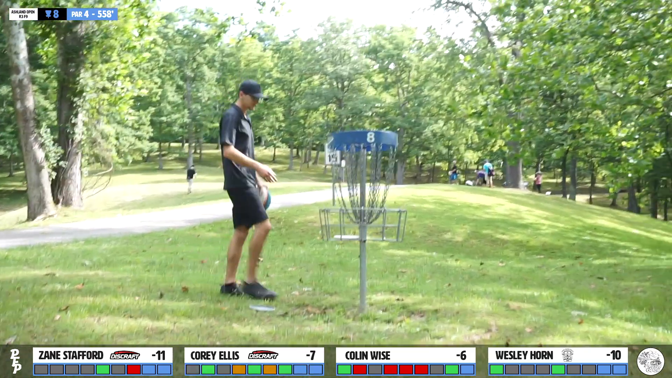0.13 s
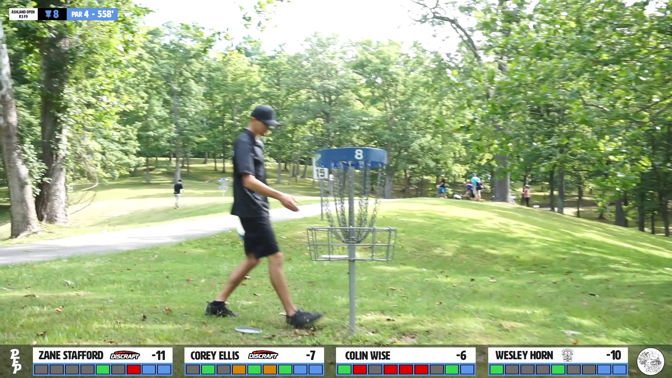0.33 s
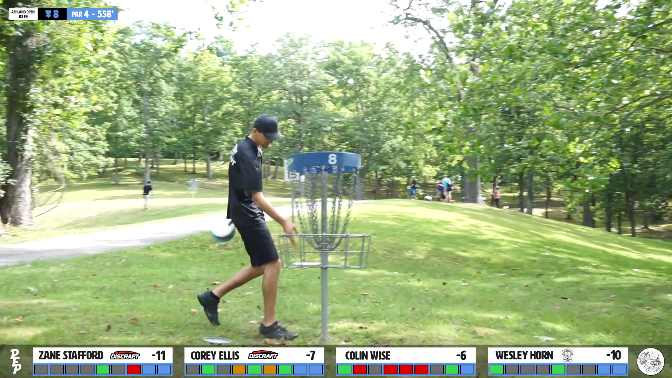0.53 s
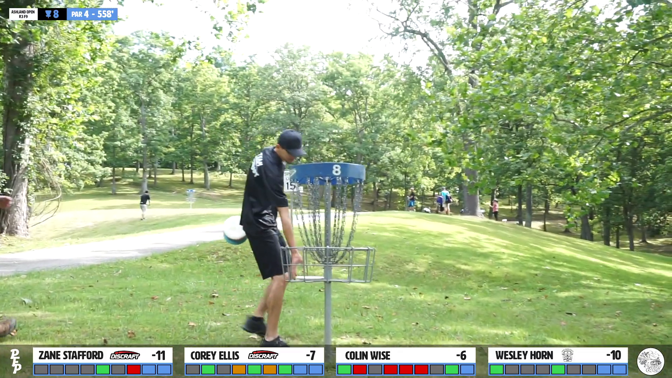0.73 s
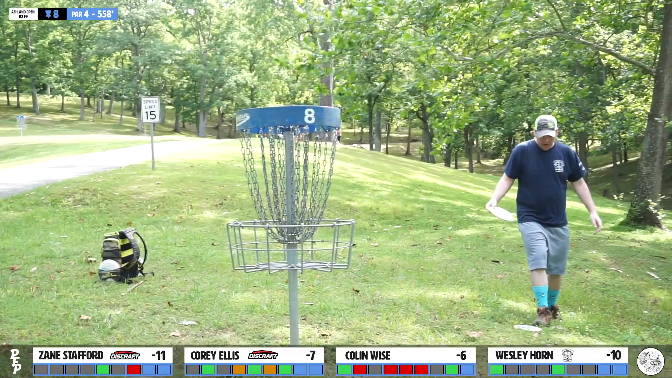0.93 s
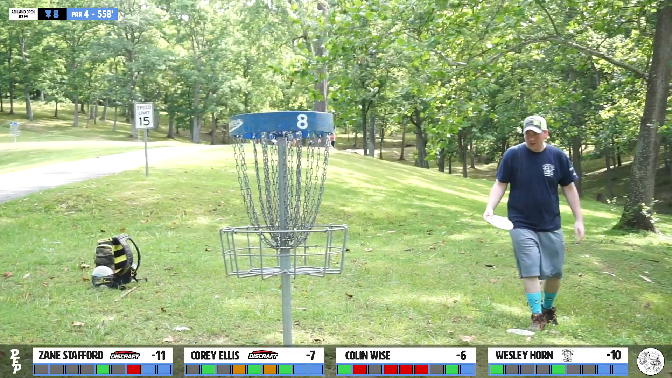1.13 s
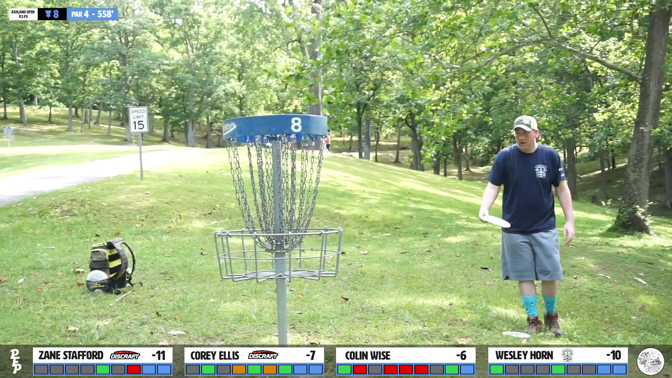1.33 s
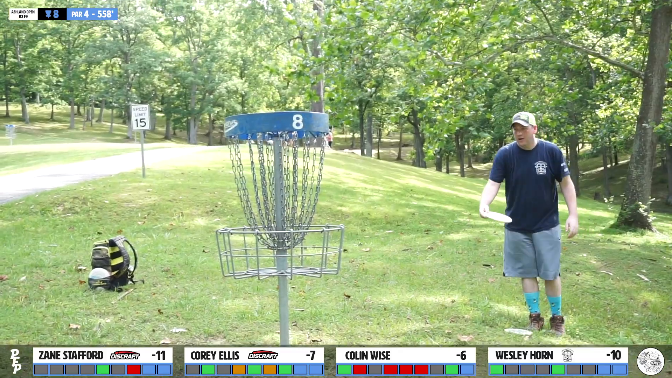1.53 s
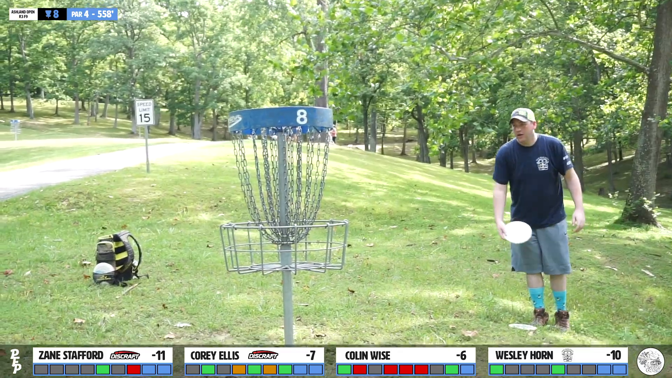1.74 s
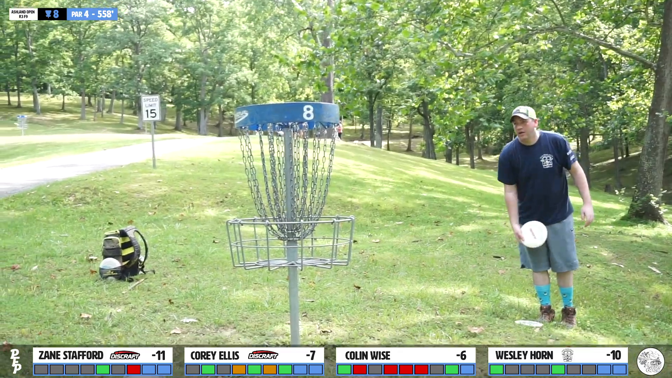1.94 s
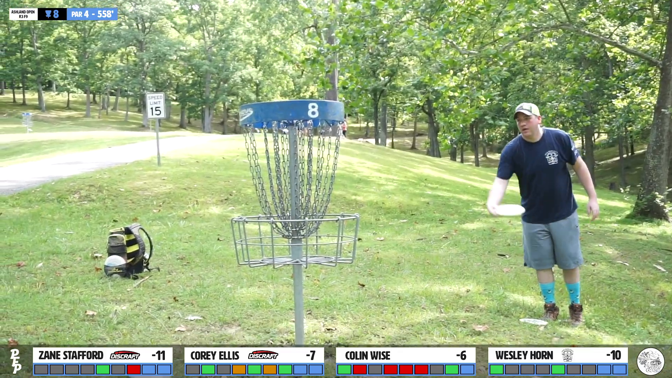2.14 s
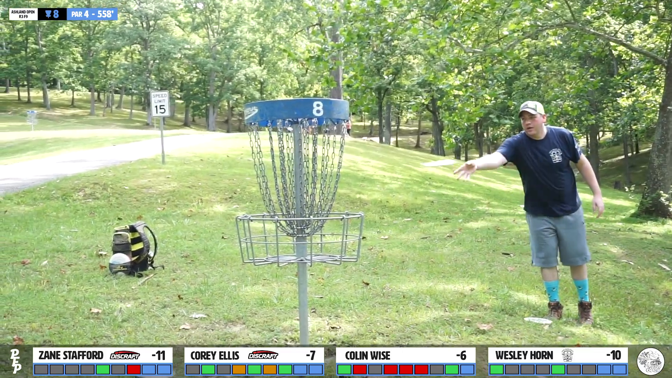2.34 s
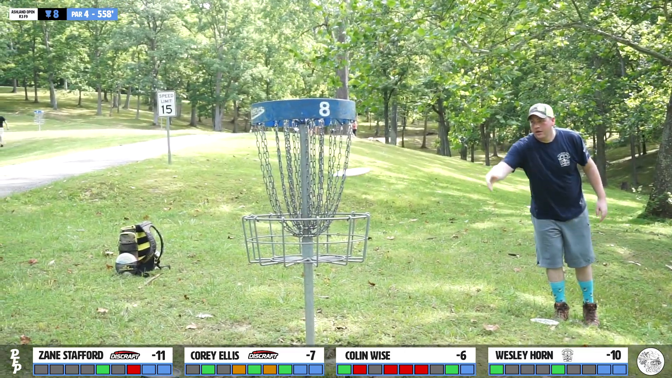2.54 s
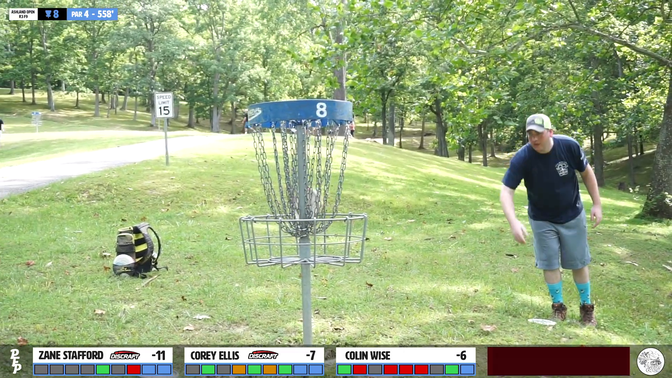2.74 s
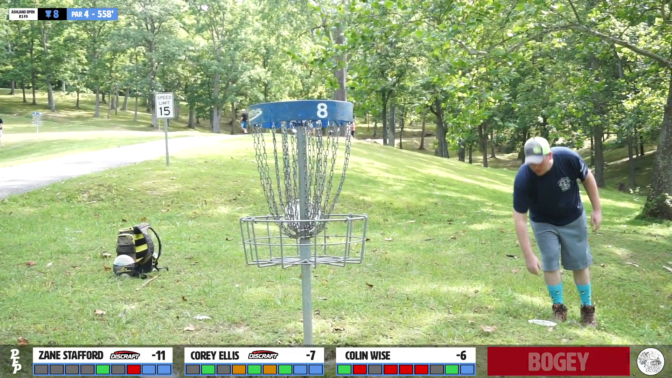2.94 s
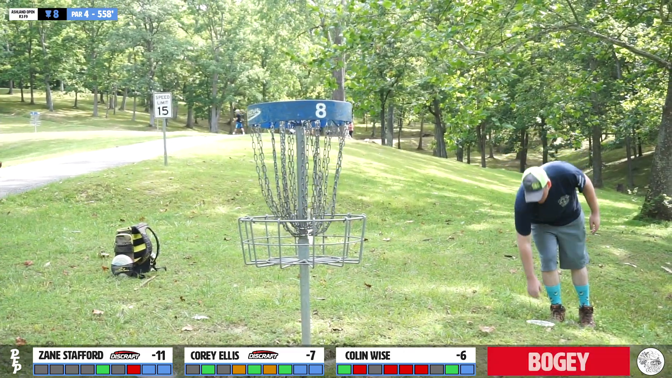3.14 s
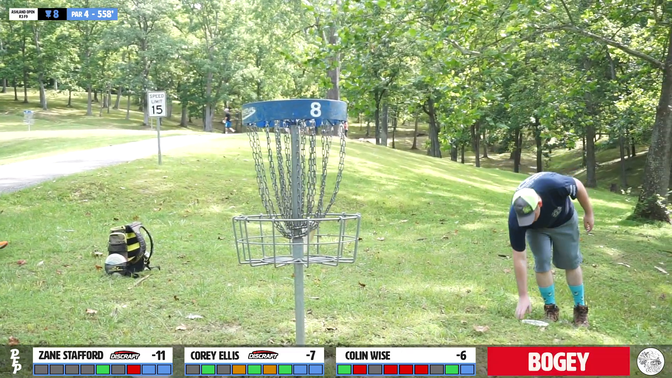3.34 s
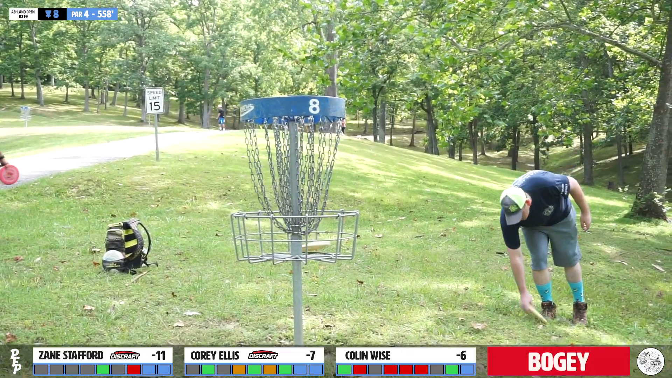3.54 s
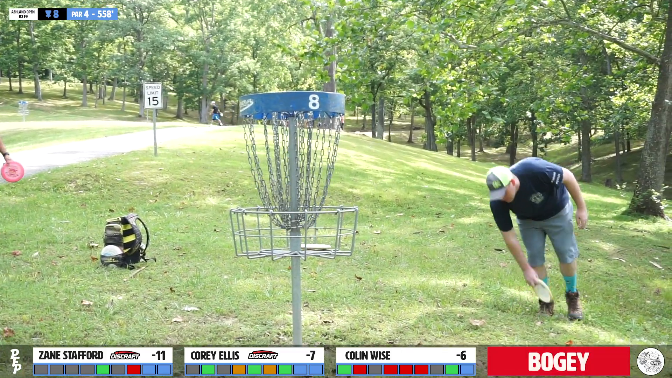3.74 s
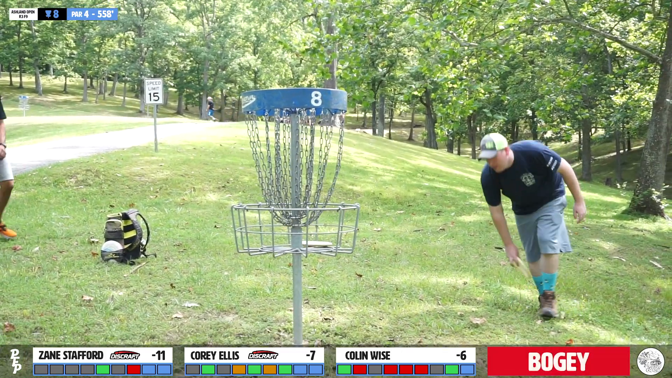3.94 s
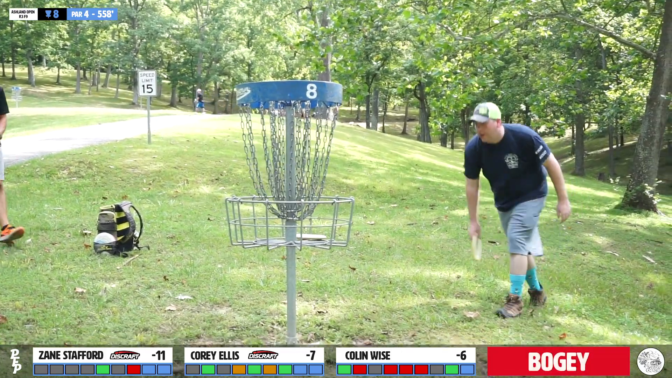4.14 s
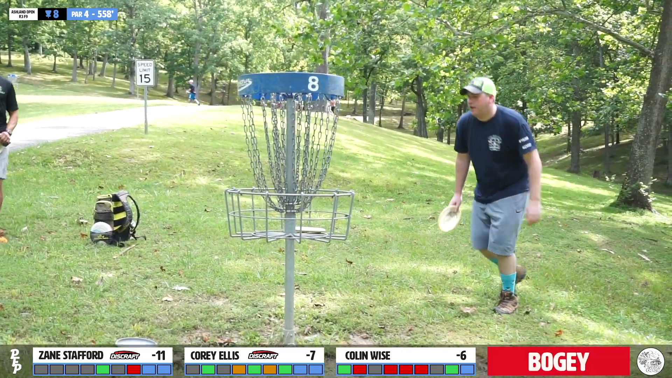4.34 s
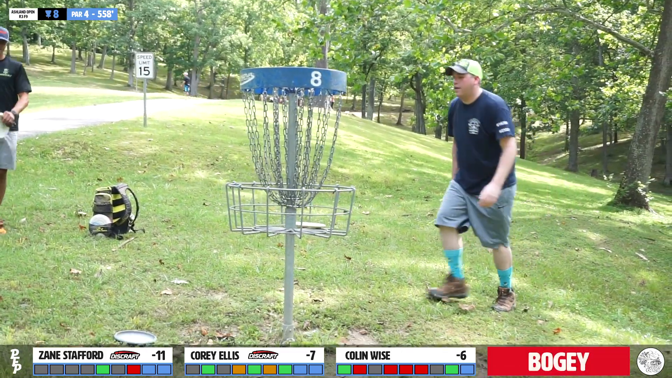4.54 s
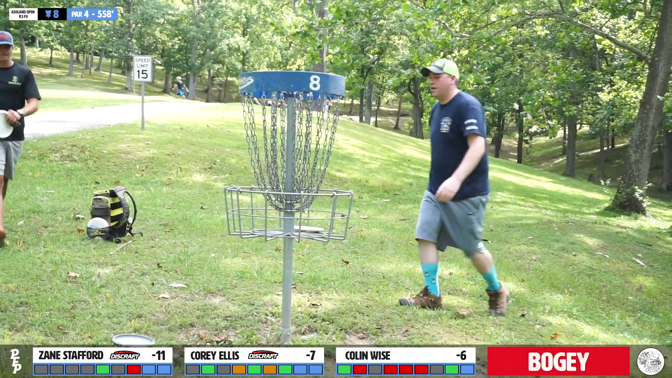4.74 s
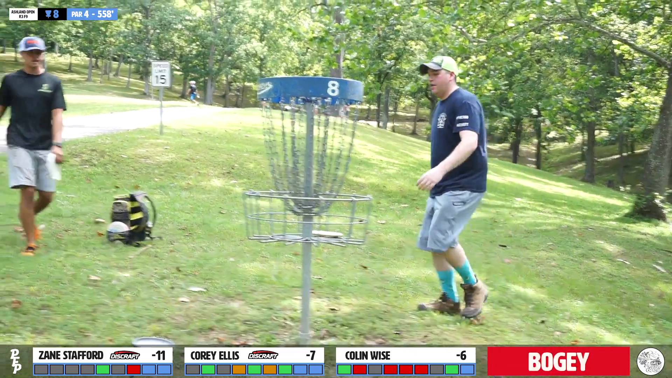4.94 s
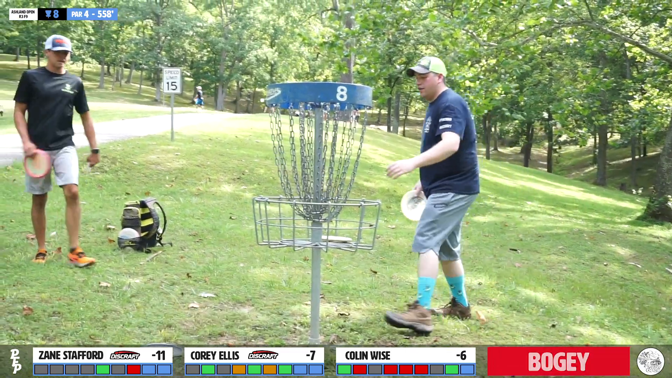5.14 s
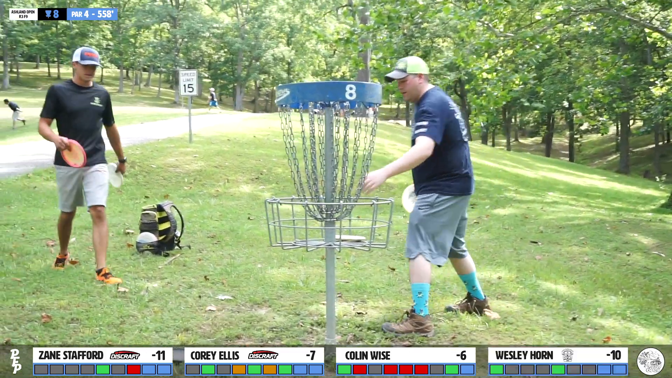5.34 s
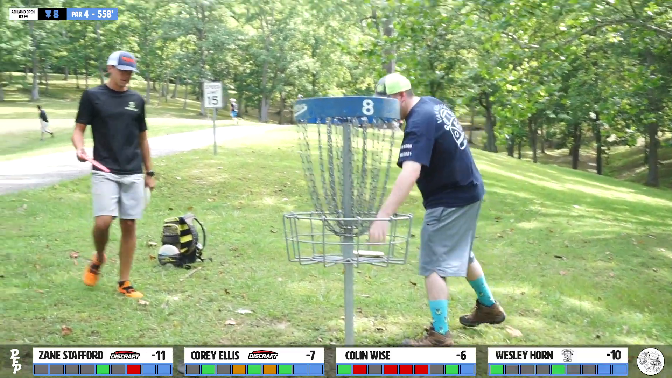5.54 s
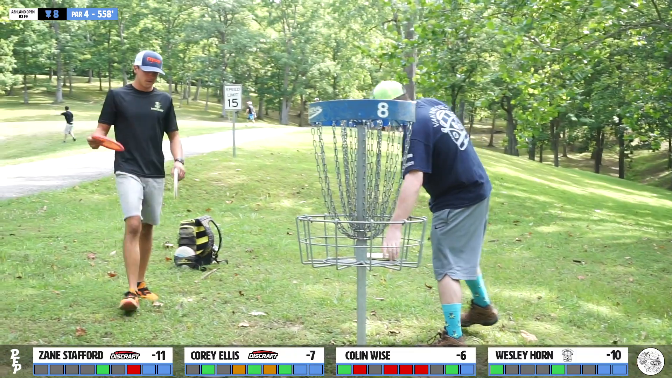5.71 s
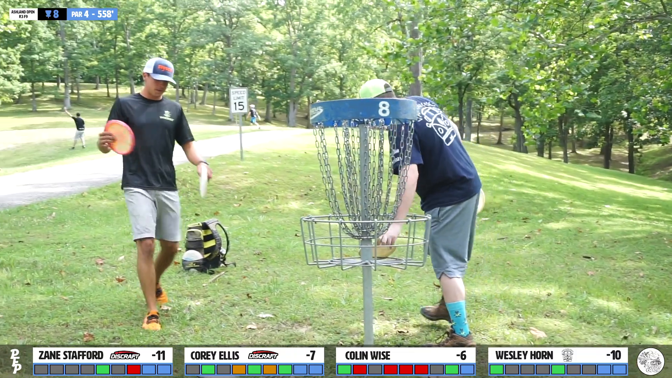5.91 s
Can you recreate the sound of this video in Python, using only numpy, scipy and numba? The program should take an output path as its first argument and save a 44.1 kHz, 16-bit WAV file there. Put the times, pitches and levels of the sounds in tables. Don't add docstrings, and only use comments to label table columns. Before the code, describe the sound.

A quiet wooded park, soft leaf hiss and far traffic. From 0 to 1 s, shoes close on the left sweep and crunch grass, with pebble taps, snapping twigs and light wind puffs; at 0.7-0.97 s a bird whistles down then up, cut off by a scene change. A sharp twig snap at 1.07 s, then sparser, softer steps and a faint farther bird at 1.2 s. At 2.05-2.3 s a clear bird phrase echoes among trunks. At 2.66 s a plastic disc slams into steel chains: a loud bright clash, hollow knocks, scraping links, and a high beating hoop ring from 2.8 s. It swings back at 3.12 s, drops on the tray at 3.28 s and thuds again at 3.65-3.8 s with chain jingles. A sole squeaks at 4.23 s; small clinks and a loose wire follow at 4.5-4.65 s. The bird calls at 4.7-5.05 s, over light grass steps until 6 s.

```python
import sys
import numpy as np
from scipy import signal
from scipy.fft import rfft, irfft, next_fast_len
from scipy.io import wavfile
from scipy.ndimage import uniform_filter1d, map_coordinates
from numba import njit

SR = 44100
rng = np.random.default_rng(int(sys.argv[2]) if len(sys.argv) > 2 else 0)


def voltage_ratio(level):
    return 10 ** (np.asarray(level, float) / 20)


def wav_record(signal):
    frames = np.transpose(np.atleast_2d(signal))
    bounded = np.clip(frames, -1, 1)
    quanta = np.round(bounded * 32767).astype(np.int16)
    wavfile.write(sys.argv[1], SR, quanta)


N = 267687

SCENE_CHANGE_S, IMPACT_S = 0.97, 2.656

# pitch_hz, level_db
AIR = [(15, -60), (25, -25), (60, -16), (190, -9), (293, -2.5), (476, -3), (887, 3), (988, -3.5), (1290, 0),
       (2000, -7), (3080, -4), (5280, -7), (12900, -10), (16000, -13)]
AIR_DB = -69.5
# time_s, level_db
DUCK = [
    (2.78, 0.5),
    (2.86, -17),
    (3.2, -6),
    (3.35, -6),
]
# peak_s, level_db, fall_20db_s
GUSTS = [
    (.04, -90, .3),
    (.24, -81, 0.15),
    (.38, -78, 0.2),
    (.545, -82, 0.1),
    (.61, -71, 0.09),
    (.68, -70, 0.05),
    (.76, -78, 0.22),
    (.86, -67.5, 0.09),
]
GUST_RISE_SHARE = 0.43
# peak_s, level_db, rise_20db_s, fall_20db_s
TRAFFIC = [
    (4.08, -86, .1, .2),
    (5.05, -85, .15, .6),
    (5.45, -86, .4, .4),
    (5.9, -85, .5, .8),
]
# pitch_hz, level_db
WIND = [(22, -17), (50, 1.5), (110, 7.0), (220, -14)]
ENGINE = [(60, -12), (110, -3), (280, 0), (420, -12)]

# time_s, pitch_hz, level_db
FALL = [
    (.718, 3600, -74),
    (.725, 3700, -69),
    (.74, 3250, -70),
    (.764, 2960, -56),
    (.8, 2900, -59.5),
    (.813, 2530, -56),
    (.832, 2290, -61),
    (.85, 2150, -68),
]
# time_s, pitch_hz, level_db
TURN = [
    (.855, 2160, -68),
    (.873, 2424, -58.5),
    (.886, 2680, -68),
    (.894, 3000, -56),
    (.913, 3550, -56),
    (.924, 3000, -61),
    (.94, 2450, -59),
    (.955, 2550, -62),
    (.975, 3000, -63),
]
# time_s, pitch_hz, level_db
UPBEAT = [
    (2.02, 3380, -72),
    (2.037, 4850, -78.5),
    (2.056, 3100, -67),
]
# time_s, pitch_hz, level_db
ANSWER = [
    (2.058, 3080, -70),
    (2.09, 3278, -56.5),
    (2.124, 3310, -53.5),
    (2.154, 3040, -57),
    (2.168, 3244, -56),
    (2.2, 4124, -60),
    (2.25, 3040, -57.5),
    (2.31, 2520, -67.5),
    (2.325, 2520, -75.5),
]
# time_s, echo_db
TURNING = [
    (2.1, -7),
    (2.17, -4),
    (2.2, 3),
    (2.32, 4),
    (2.4, 0),
]
# time_s, pitch_hz, level_db
FAR = [
    (1.18, 3640, -73.5),
    (1.245, 2505, -71),
    (1.285, 3000, -72),
    (1.305, 3300, -77),
    (1.33, 2900, -80),
]
# time_s, pitch_hz, level_db
CHIP = [
    (3.452, 3480, -72),
    (3.462, 3450, -60),
    (3.476, 3430, -72),
]
# time_s, pitch_hz, level_db
LAST = [
    (4.7, 3560, -70),
    (4.735, 3240, -71),
    (4.772, 2900, -57),
    (4.822, 2143, -70),
    (4.86, 2500, -70),
    (4.897, 3590, -55),
    (4.907, 3100, -60),
    (4.93, 2456, -70),
    (4.975, 3003, -58),
    (5.06, 2850, -69),
]
HIDDEN_DB = -4.5
STIR_S, STIR_RATE_HZ = .00006, 150

# pitch_hz, level_db
SWISH = [(880, -38), (1500, -7.5), (1830, -9.5), (1980, -6.5), (5660, -5), (7540, -1.5), (10500, 1),
         (14900, 0), (16000, -10.5)]
CRUNCH = [(88, -32), (150, -19), (243, -9), (759, -3.5), (1040, -6), (1410, -5.5), (2880, -9.5),
          (4000, -15.5), (5200, -19.5), (8800, -120)]
# peak_s, level_db, rise_20db_s, fall_20db_s
SWEEPS = [(0.0, -59, .05, 0.077), (.075, -56, .015, .1), (.14, -50.5, 0.15, 0.2), (.215, -55, .08, .1),
          (.41, -61, 0.17, 0.33), (.612, -53, .02, .15), (.76, -56, 0.26, 0.22), (1.09, -64, 0.032, 0.13),
          (1.43, -64.5, 0.25, 0.32), (1.68, -74, 0.27, 0.39), (1.93, -60, 0.1, 0.084),
          (2.115, -60.5, 0.091, 0.13), (2.25, -70.5, .1, .2), (2.48, -66, 0.25, 0.16),
          (4.128, -68, 0.045, .04), (4.23, -60.5, 0.12, 0.034), (4.37, -70.5, 0.14, 0.13),
          (4.695, -54, 0.096, 0.08), (4.85, -68.5, 0.36, 0.49), (5.24, -64.5, 0.53, 0.63),
          (5.8, -68.5, .04, 0.17), (5.965, -66, 0.074, .04), (6.016, -64.5, .01, 0.047)]
# peak_s, level_db, fall_20db_s
TREADS = [(0.0, -59.5, .2), (.19, -54.5, 0.27), (.42, -65.5, .5), (.64, -62, 0.14), (.81, -58, 0.38),
          (1.06, -62.5, 0.19), (1.25, -67, 0.13), (1.53, -72, .5), (3.45, -72, .6), (3.75, -70, .5),
          (4.07, -67.5, 0.43), (4.19, -66.5, 0.1), (4.36, -78, .45), (4.56, -71.5, .45),
          (5.05, -63.5, 0.45), (5.3, -70.5, 0.96), (5.6, -68.5, 0.6), (5.75, -66, 0.5), (5.97, -69, .3)]
TREAD_RISE_SHARE = 0.75
NEAR_LEFT_DB = 2
# start_s, peak_db, pitch_hz
TAPS = [(.176, -41, 1140), (.194, -34, 1165), (.24, -43.5, 1100), (.282, -61, 563), (.407, -41, 2630),
        (.633, -43, 1290), (.752, -40.5, 2080), (.815, -37, 1190), (1.042, -36, 2460), (1.166, -56.5, 940),
        (1.186, -56, 953), (1.256, -54, 524), (1.257, -50, 1900), (1.767, -58, 905), (2.225, -46.5, 2480),
        (3.654, -47.5, 1160), (3.981, -61.5, 394), (4.05, -57.5, 466), (4.097, -49, 3850),
        (4.098, -55, 2500), (4.169, -54.5, 780), (4.254, -58, 1290), (5.041, -46, 2600), (5.096, -50, 1510),
        (5.153, -55, 910), (5.849, -48.5, 841), (5.949, -50, 730)]
# start_s, peak_db
SNAPS = [(.064, -48), (.176, -50), (.282, -45), (.408, -44), (.547, -59), (.601, -43), (.633, -43),
         (.691, -50), (0.753, -52), (1.068, -32.5), (1.364, -56), (1.589, -48), (1.768, -49.5),
         (2.642, -52), (4.097, -58), (4.68, -54), (4.6937, -51), (4.701, -53), (4.929, -58), (5.131, -52),
         (5.096, -49.5), (5.153, -58), (5.504, -49), (5.8, -65.5), (5.949, -54), (6.012, -50.5)]
TWIG_HZ, TWIG_BODY_DB = 1500, -26
# time_s, pitch_hz, level_db
SQUEAK = [
    (4.226, 4000, -64),
    (4.238, 3930, -54),
    (4.246, 3700, -64.5),
    (4.258, 3620, -73),
    (4.295, 3630, -82),
]
# start_s, peak_db
TICKS = [(.064, -46), (.093, -42), (.153, -38), (.176, -42), (.184, -44), (.196, -42), (.216, -40),
         (.282, -46), (.407, -44), (.547, -46), (.602, -43), (.611, -43), (.691, -42), (1.256, -47),
         (5.504, -50), (2.6565, -32), (2.661, -30), (2.738, -30), (2.7775, -31), (2.8005, -29),
         (3.285, -34)]
TICK_S = .0007

# pitch_hz, level_db, t60_s
TRAY = [(277.5, -13.5, 0.88), (391, -12.5, 0.68), (813, -11.5, 0.34), (1190, -1, 0.27), (1290, -8, 1),
        (1723, -3.5, 0.84), (2024, -5, 0.44), (2300, -5, 0.95), (2550, -20, 0.28), (2520, -6.5, 0.37),
        (2800, -8.5, 0.72), (2884, 1, 0.14)]
# start_s, level_db, tilt_db_per_octave about 2 kHz
TRAY_BLOWS = [
    (3.277, -64.5, 1.5),
    (3.652, -64.5, -.5),
]
# pitch_hz, level_db, t60_s
SPOKES = [(275, -1, 1.1), (398, -6, 1.2), (1195, -4, 1.), (1297, -6, .8), (1723, -1, 1.3), (2295, 0, 1.4),
          (2745, -5, .9), (2842, -3, .8)]
SPOKES_DB = -6
# start_s, peak_db, pitch_hz
THUDS = [
    (3.279, -54, 695),
    (3.652, -51, 850),
    (3.776, -53, 800),
    (3.78, -61, 240),
]
# start_s, peak_db, pitch_hz
PINGS = [
    (4.553, -70, 2150),
    (4.59, -70, 2220),
    (4.62, -72, 2170),
    (4.65, -73, 2200),
    (5.73, -69, 2280),
]

# pitch_hz, level_db, t60_s
RIM = [(2834, -6.5, 0.33), (2996, -2.5, 0.13), (3160, -4.5, 0.17), (3381, -8, 0.17), (6830, -6, .1)]
# start_s, level_db
RIM_BLOWS = [
    (2.806, -56),
    (2.88, -59),
    (2.935, -56),
    (2.981, -59),
    (3.025, -58),
    (3.138, -58),
]
# start_s, peak_db, pitch_hz
CLANKS = [(2.7083, -44, 5300), (2.7203, -37, 4710), (2.8, -42, 4740), (2.8074, -33, 4700),
          (2.845, -44, 5080), (3.1264, -41, 5190), (3.14, -49, 6200), (3.2196, -41.5, 4720),
          (3.243, -47, 4710), (3.262, -50, 4770), (3.43, -58, 4700), (3.4995, -57, 4620),
          (3.528, -61, 4740), (3.664, -63, 4600), (3.838, -49, 4660), (3.8487, -43.5, 4710),
          (4.213, -59, 4700), (4.224, -57, 4720), (4.244, -62, 4800)]
# pitch_hz, level_db, t60_s
HOOP = [(4497, -.5, 1.2), (4530, 0, .6), (4730, -8, .15), (5250, -6, .04), (12480, -9, 1.1),
        (12517, -8, .9)]
# start_s, level_db, touched_s (before the start: damped throughout), ring_left_db
HOOP_BLOWS = [
    (2.7207, -49, 2.55, -5),
    (2.813, -31, 3.122, -14),
    (3.127, -51.5, 3.2, -5),
    (3.2194, -53, 3.13, -3),
    (3.284, -57.5, 3.04, -4),
    (3.4997, -64, 2.9, -7),
    (3.668, -70, 3.1, -2),
    (3.848, -59, 4, -6),
    (4.551, -76, 4.57, -8),
]
FED_SHARE, FED_S = 0.43, .04
SHAKE_FROM_S, SHAKE_DB = 3.13, 3.5
HOOP_ECHO_DB = -10

# start_s, peak_db, pitch_hz
KNOCK = [(2.658, -37, 1714), (2.682, -35, 2340), (2.702, -40, 1305), (2.731, -31, 1800),
         (2.748, -35.5, 768), (2.768, -38, 1090), (2.77, -42, 2500), (2.786, -38, 1780),
         (2.787, -40.5, 800), (2.806, -46, 743), (2.832, -46, 2320), (2.859, -43, 1650), (2.948, -49, 727),
         (2.978, -44, 744)]
# pitch_hz, level_db
DISC = [(150, -69), (250, -40), (384, -13), (479, -14.5), (761, -5), (1340, -4.5), (1490, -20),
        (1780, -4.5), (4000, -18), (5200, -43), (8800, -120)]
# peak_s, level_db, fall_20db_s
SCRAPE = [
    (2.657, -49.5, 0.4759),
    (2.733, -46.5, 0.1739),
    (2.979, -61, 0.09),
]
# peak_s, level_db, fall_20db_s
SLAPS = [
    (2.657, -43.5, 0.13),
    (2.712, -59, 0.11),
    (2.822, -52.5, 0.1437),
    (2.93, -59, 0.3),
    (3.127, -52.5, 0.1438),
    (3.275, -59, 0.11),
    (3.85, -58.5, 0.02),
    (4.553, -70, 0.14),
]
SCRAPE_RISE_S, SLAP_RISE_S = 0.002, 0.0015
CLINK_RATE_HZ, CLINK_LOW_HZ, CLINK_HIGH_HZ, CLINK_T60_S = 2500, 3300, 11000, .016
CLINK_DB = -2

# start_s, peak_db, pitch_hz, t60_s
SOLO = [(2.6565, -35, 11900, .05), (2.7225, -30, 11900, .06), (2.7715, -29, 11800, .04),
        (2.811, -30, 11900, .05), (2.842, -32, 11850, .05), (2.854, -32, 11900, .06),
        (2.892, -31, 12700, .06), (2.958, -31, 11930, .06), (2.982, -33, 15200, .12),
        (3.046, -41, 11800, .03), (3.051, -30, 11790, .06), (3.082, -42, 11800, .15),
        (3.098, -37, 9600, .05), (3.128, -33, 12700, .06), (3.137, -33, 11900, .05),
        (3.219, -36, 11850, .12), (3.285, -35, 11900, .04), (3.277, -55, 1800, .04), (3.28, -57, 2850, .06),
        (3.797, -48, 12790, .4), (3.8, -52, 11700, .3), (3.835, -50, 12925, .35)]
# pitch_hz, level_db, t60_s, spread between links (0-1)
LINK = [(9600, -9, .05, .014), (11880, 0, .11, .011), (12750, -4, .13, .013), (13650, -12, .06, .012),
        (15150, -9, .05, .011)]
# start_s, peak_db
CLASH = [(2.659, -27.5), (2.7083, -30), (2.74, -29), (2.7746, -31), (2.797, -28), (2.8548, -35),
         (2.892, -33), (2.9382, -32), (2.959, -35), (2.9817, -34), (3.051, -35), (3.0973, -33),
         (3.116, -28.5), (3.218, -34), (3.266, -35.5), (3.284, -34), (3.3394, -48), (3.393, -46),
         (3.467, -43), (3.5003, -45), (3.559, -55), (3.6283, -55), (3.672, -46), (3.7052, -38.5),
         (3.725, -41.5), (3.7737, -45), (3.7967, -38.5), (3.8337, -42.5), (4.47, -69), (4.5084, -55.5),
         (4.546, -52), (4.5517, -43.5), (4.5717, -47.5), (4.6181, -55), (4.6258, -52), (4.6774, -46)]
# peak_s, ring_level_db, fall_20db_s
SWINGS = [(2.66, -36.5, 0.1948), (2.712, -32.5, 0.26), (2.755, -33, .2), (2.822, -31.5, 0.1356),
          (2.9, -41, 0.19), (2.96, -44, 0.07), (3.051, -45, 0.02), (3.122, -37, 0.09), (3.19, -43, 0.13),
          (3.28, -43.5, .005), (3.4, -52.5, 0.2), (3.58, -58.5, 0.1), (3.64, -54, 0.06),
          (3.712, -43.5, 0.07), (3.797, -48, 0.03), (3.84, -49, 0.14), (4.126, -67, 0.24),
          (4.575, -53, 0.03), (4.62, -57, 0.04), (4.65, -51, 0.03)]
SWING_RISE_S, CONTACT_DB = 0.0067, -24
MUTED = 0.76
# pitch_hz, level_db
CONTACT = [(1500, -6), (2500, -7.5), (5000, 2.5), (8000, -1.0), (12000, 4.5), (15800, 1.5)]

LOW_CUT_HZ, TOP_HZ = 280, 15950


def bands(x, points):
    hz, db = np.transpose(points)
    size = next_fast_len(N)
    f = np.maximum(np.arange(size // 2 + 1) * SR / size, 1)
    gain = voltage_ratio(np.interp(np.log(f), np.log(hz), db, left=-80, right=-80))
    y = irfft(rfft(x, size) * gain, size)[..., :N]
    return y / np.sqrt(np.mean(y ** 2))


def cut(x, hz, kind, order=2):
    return signal.sosfilt(signal.butter(order, hz, kind, fs=SR, output="sos"), x)


def walk(rate):
    k = int(SR / rate)
    steps = np.repeat(rng.standard_normal(N // k + 1), k)
    steps = uniform_filter1d(uniform_filter1d(steps, k), k)[:N]
    return steps / np.std(steps)


def add(out, s, x):
    i = int(s * SR)
    out[i:i + len(x)] += x[:N - i]


def swell(rows, rise_s=0., rise_share=0.):
    t, power = np.arange(0, N, 32) / SR, 1e-14
    for s, db, *rise, fall in rows:
        up = rise[0] if rise else rise_s + rise_share * fall
        power = power + voltage_ratio(db - 20 * np.maximum((s - t) / up, (t - s) / fall)) ** 2
    return np.interp(np.arange(N) / SR, t, 10 * np.log10(power))


def bursts(rate, scatter_db, hold_s):
    kicks = (rng.random(N) < rate / SR) * voltage_ratio(scatter_db * np.clip(rng.standard_normal(N), -2, 2))
    fading = signal.lfilter([1], [1, -np.exp(-1 / (hold_s * SR))], kicks)
    return fading / np.sqrt(np.mean(fading ** 2))


def pan(x, left_db, lag=0):
    size = next_fast_len(N)
    f = np.arange(size // 2 + 1) * SR / size
    advance = np.exp(2j * np.pi * f * lag / SR / (1 + (f / 3000) ** 2))
    early = irfft(rfft(x, size) * advance, size)[:N]
    return np.array([early * voltage_ratio(left_db / 2), x * voltage_ratio(-left_db / 2)])


def wide(points, same, envelope=1, lag=4):
    mid, side = bands(envelope * rng.standard_normal((2, N)), points)
    same = np.clip(same, 0, 1)
    shared = np.sqrt((1 + same) / 2) * pan(mid, 0, lag)
    return shared + np.sqrt((1 - same) / 2) * side * np.array([[1], [-1]])


def trees(x, t60, gap_s):
    t = np.arange(SR * 3 // 2) / SR
    fade = np.exp(-np.log(1000) * t / t60) * np.clip(t / gap_s, 0, 1)
    tail = rng.standard_normal((2, len(t))) * fade
    return signal.fftconvolve(x[None], tail / np.sqrt(np.sum(tail[0] ** 2)), axes=1)[:, :N]


def stirred(x):
    return map_coordinates(x, [np.arange(N) + STIR_S * SR * walk(STIR_RATE_HZ)], mode="nearest")


@njit
def strikes(start, hz, decay, size, rise, length):
    out = np.zeros(length)
    for k in range(len(start)):
        pole = np.exp(2j * np.pi * hz[k] - decay[k])
        z, missing = size[k] + 0j, 1.
        for i in range(start[k], min(length, start[k] + int(6 / decay[k]))):
            out[i] += z.imag * (1 - missing)
            z *= pole
            missing *= rise
    return out


def struck(start, db, hz, t60, rise_s):
    start = np.broadcast_to(start[:, None], db.shape).ravel().astype(int)
    decay = np.log(1000) / (t60.ravel() * SR)
    return strikes(start, hz.ravel() / SR, decay, voltage_ratio(db).ravel(), np.exp(-1 / (rise_s * SR)), N)


def knocks(rows, cycles, extra_db):
    out, t = np.zeros(N), np.arange(SR // 8) / SR
    for s, db, hz, *treble in rows:
        noise = rng.standard_normal((2, len(t)))
        rough = 1 + .5 * uniform_filter1d(noise[0], size=12)
        body = np.sin(2 * np.pi * hz * t) * rough * np.exp(-t * hz / cycles)
        add(out, s, voltage_ratio(db + extra_db) * body * np.clip(t * hz, 0, 1))
        for crack_db in treble:
            add(out, s, voltage_ratio(crack_db - 6) * cut(noise[1], 2300, "high") * np.exp(-t / 0.0044))
    return out


def whistle(rows, second_db=-60, flutter_db=3.0, waver_hz=15.):
    s, hz, db = np.transpose(rows)
    out, t = np.zeros(N), np.arange(s[0] - .01, s[-1] + .01, 1 / SR)
    flutter, waver = walk(120.)[:len(t)], walk(250.)[:len(t)]
    pitch_hz = uniform_filter1d(np.interp(t, s, hz), size=200) + waver_hz * waver
    phase = 2 * np.pi * np.cumsum(pitch_hz) / SR
    level_db = np.interp(t, s, db, left=-140, right=-140) + flutter_db * flutter
    level = uniform_filter1d(voltage_ratio(level_db), size=120) * np.sqrt(2)
    add(out, t[0], level * (np.sin(phase) + voltage_ratio(second_db) * np.sin(2 * phase)))
    return out


def air():
    breath_db = .8 * walk(1.5) + .8 * walk(12)
    duck_db = np.interp(np.arange(N) / SR, *np.transpose(DUCK))
    leaves = voltage_ratio(AIR_DB + breath_db + duck_db) * wide(AIR, 0.21)
    gust_db = swell(GUSTS, rise_share=GUST_RISE_SHARE) + 0.79 * walk(22.0)
    thuds = wide(WIND, 0.86) * voltage_ratio(gust_db)
    engines = voltage_ratio(swell(TRAFFIC) + 1.5 * walk(10.)) * wide(ENGINE, .8)
    return leaves + thuds + engines


def birds():
    first = whistle(FALL, flutter_db=3.5, waver_hz=45.) + whistle(TURN, flutter_db=3.5, waver_hz=45.)
    last = whistle(LAST, flutter_db=4., waver_hz=60.)
    middle = whistle(UPBEAT) + whistle(ANSWER, flutter_db=2., waver_hz=30.)
    far = whistle(FAR, waver_hz=60.)
    chip = whistle(CHIP, flutter_db=2., waver_hz=50.)
    t = np.arange(N) / SR
    before = np.clip((SCENE_CHANGE_S - t) / 0.0038, 0, 1)
    turning = voltage_ratio(np.interp(t, *np.transpose(TURNING)))
    haze = trees(stirred(middle * turning + far + last + voltage_ratio(-6.) * chip), t60=1.15, gap_s=0.01)
    first_echo = before * voltage_ratio(-2.5) * trees(stirred(first), t60=1.0, gap_s=0.0057)
    wet = first_echo + np.array([stirred(port) for port in haze])
    dry = first * before + middle + voltage_ratio(HIDDEN_DB) * (far + last) + chip
    return pan(dry, 6.3, lag=4.8) + voltage_ratio(2.5) * wet * voltage_ratio(np.array([[1.5], [-1.5]]))


def grass():
    swish_db, crunch_db = swell(SWEEPS), swell(TREADS, rise_share=TREAD_RISE_SHARE)
    swish = voltage_ratio(swish_db + 3.0) * wide(SWISH, 0.16, 0.94 + 0.58 * bursts(600, 3.6, 0.0013))
    crunch = voltage_ratio(crunch_db - 0.78) * wide(CRUNCH, 0.66, 0.88 + 0.64 * bursts(200, 5.3, 0.0026))
    left_db = 1.2 + NEAR_LEFT_DB / 2 * (np.arange(N) < SCENE_CHANGE_S * SR)
    return (swish + crunch) * voltage_ratio(np.array([left_db, -left_db]))


def footfalls():
    twigs = [(s, db + TWIG_BODY_DB, TWIG_HZ, db) for s, db in SNAPS]
    squeak = whistle(SQUEAK, second_db=-6, flutter_db=3.5, waver_hz=60.3)
    return knocks(TAPS + twigs, cycles=3.3, extra_db=-3.5) + squeak


def ticks():
    out, t = np.zeros(N), np.arange(SR // 100) / SR
    for s, db in TICKS:
        crack = cut(rng.standard_normal(len(t)), 2500, "high")
        add(out, s, voltage_ratio(db - 3) * crack * np.exp(-t / TICK_S))
    return out


def tray(count=70):
    s, db, tilt_db = np.repeat(np.transpose(TRAY_BLOWS), count, axis=1)
    later_s = np.tile(np.linspace(0, 1, count) ** 1.6, len(TRAY_BLOWS)) * .33
    off, mix = rng.standard_normal((len(s), 2, len(TRAY))).transpose(1, 0, 2)
    hz, mode_db, t60 = np.transpose(TRAY)
    bright_db = tilt_db[:, None] * np.log2(hz / 2000)
    db = (db - 34 * later_s)[:, None] + mode_db - 3 + 5 * mix + bright_db
    return struck((s + later_s) * SR, db, hz * (1 + .018 * off), 0.22 * t60 + 0 * off, rise_s=0.00077)


def spokes():
    s, db, tilt_db = np.transpose(TRAY_BLOWS)
    hz, mode_db, t60 = np.transpose(SPOKES)
    db = db[:, None] + SPOKES_DB + mode_db + tilt_db[:, None] * np.log2(hz / 2000)
    return struck(s * SR, db, hz + 0 * db, t60 + 0 * db, rise_s=.01) * voltage_ratio(3. * walk(30.))


def loose_wire():
    return knocks(PINGS, cycles=35.0, extra_db=1.0)


def rim(count=3):
    s, db = np.repeat(np.transpose(RIM_BLOWS), count, axis=1)
    late, off, mix = rng.standard_normal((len(s), 3, len(RIM))).transpose(1, 0, 2)
    hz, mode_db, t60 = np.transpose(RIM)
    start_s = s + .008 * np.abs(late[:, 0])
    db = db[:, None] - 7 + mode_db + 4 * mix
    return struck(start_s * SR, db, hz * (1 + .012 * off), t60 + 0 * off, rise_s=0.0012)


def hooks(count=4):
    s, db, hz = np.repeat(np.transpose(CLANKS), count, axis=1)
    late, off, mix = rng.standard_normal((len(s), 3)).T
    start_s = s + .002 * np.abs(late)
    hz = (hz * (1 + .014 * off))[:, None]
    return struck(start_s * SR, (db - 6 + 2 * mix)[:, None], hz, 0.062 + 0 * hz, rise_s=0.00036)


def hoop():
    out, t = np.zeros(N), np.arange(SR) / SR
    shape = np.zeros(SR)
    for k, (hz, db, t60) in enumerate(HOOP):
        shape += (-1) ** k * voltage_ratio(db) * np.sin(2 * np.pi * hz * t) * 1000 ** (-t / t60)
    rise = (1 - np.exp(-t / 0.00043)) * (1 - FED_SHARE * np.exp(-t / FED_S))
    for s, db, touch_s, left_db in HOOP_BLOWS:
        mute = voltage_ratio(left_db * np.clip((t + s - touch_s) / 0.0047, 0, 1))
        add(out, s, voltage_ratio(db) * mute * shape * rise)
    return out * voltage_ratio(SHAKE_DB * walk(70.) * (np.arange(N) > SHAKE_FROM_S * SR))


def disc_knocks():
    return knocks(KNOCK + THUDS, cycles=4.1, extra_db=-6.0)


def scrape():
    chatter = bursts(390, 6.5, 0.0039) * rng.standard_normal(N)
    return voltage_ratio(swell(SCRAPE, rise_s=SCRAPE_RISE_S) - 4.0) * bands(chatter, DISC)


def clinks():
    start = np.flatnonzero(rng.random(N) < CLINK_RATE_HZ / SR)
    place, size = rng.random((len(start), 2)).T
    db = swell(SLAPS, rise_s=SLAP_RISE_S)[start] + CLINK_DB - 3 * np.log(1 - .95 * size) - 5
    hz = CLINK_LOW_HZ * (CLINK_HIGH_HZ / CLINK_LOW_HZ) ** place
    heard = db > -90
    hz = hz[heard, None]
    return struck(start[heard], db[heard, None], hz, CLINK_T60_S + 0 * hz, rise_s=0.00024)


def solos():
    s, db, hz, t60 = np.transpose(SOLO)
    return struck(s * SR, db[:, None], hz[:, None], t60[:, None], rise_s=.0004)


def contacts(level_db):
    hard_s, hard_db = np.transpose(CLASH)
    hard = np.zeros(N)
    hard[(hard_s * SR).astype(int)] = voltage_ratio(hard_db - 20.5)
    hard = signal.lfilter([1], [1, -np.exp(-1 / (0.0037 * SR))], hard)
    slap = voltage_ratio(swell(SLAPS, rise_s=SLAP_RISE_S) + 6)
    soft = bursts(600, 4, 0.003) * np.hypot(voltage_ratio(level_db + CONTACT_DB + 7.5), slap)
    return (soft + hard) * bands(rng.standard_normal(N), CONTACT)


def chains(count=6):
    still = np.arange(N) < IMPACT_S * SR
    level_db = np.where(still, -140, swell(SWINGS, rise_s=SWING_RISE_S))
    small = np.flatnonzero(rng.random(N) < 320 / SR)
    hard_s, hard_db = np.transpose(CLASH)
    run_s = np.repeat(hard_s, count) + .002 * rng.exponential(size=count * len(CLASH))
    start = np.r_[small, run_s * SR]
    db = np.r_[level_db[small] - 9, np.repeat(hard_db - 13, count)]
    off, mix, life = rng.standard_normal((len(start), 3, len(LINK))).transpose(1, 0, 2)
    hz, mode_db, t60, spread = np.transpose(LINK)
    mix_db = mode_db + 7 * np.clip(mix, -2, 2)
    mix_db = mix_db + 6.5 - 10 * np.log10(np.sum(voltage_ratio(mix_db) ** 2, axis=1, keepdims=True))
    uneven_life = np.exp(.45 * life)
    uneven_life[len(small):] *= MUTED
    heard = db > -95
    link_db = (db[:, None] + mix_db)[heard]
    link_hz = (hz * (1 + spread * off))[heard]
    rings = struck(start[heard], link_db, link_hz, (t60 * uneven_life)[heard], rise_s=0.00028)
    return rings + contacts(level_db)


def scene():
    basket = tray() + spokes() + loose_wire() + rim() + hooks()
    disc = disc_knocks() + scrape() + clinks()
    steel = chains() + solos() + ticks() + disc + basket
    ringing, small = hoop(), footfalls()
    echo = voltage_ratio(-10.5) * trees(steel + voltage_ratio(HOOP_ECHO_DB) * ringing + small, t60=0.36, gap_s=0.0051)
    direct = pan(steel, 2.2) + pan(ringing, 2.8, lag=4.2) + pan(small, 6.4, lag=4.4)
    near = cut(direct + echo, LOW_CUT_HZ, "high", order=4)
    return near + birds() + grass() + air()


def band_limit(x):
    return signal.sosfilt(signal.butter(12, 16200, fs=SR, output="sos"), x)


def record(dry):
    steep = signal.ellip(8, .2, 45, TOP_HZ, fs=SR, output="sos")
    mix = signal.sosfilt(steep, dry)
    return band_limit(mix)


dry = scene()
out = record(dry)
wav_record(out)
```